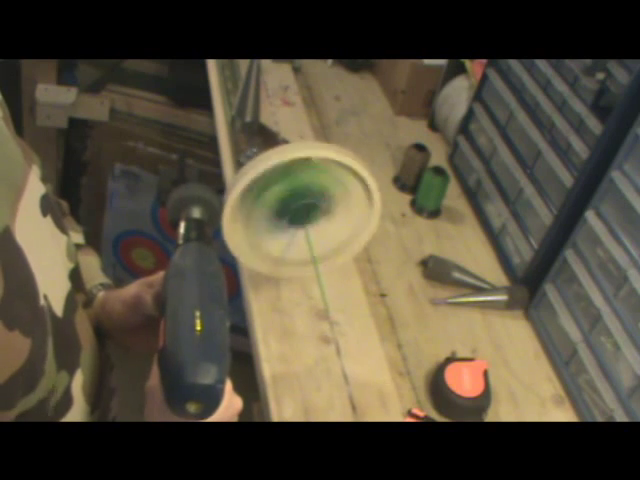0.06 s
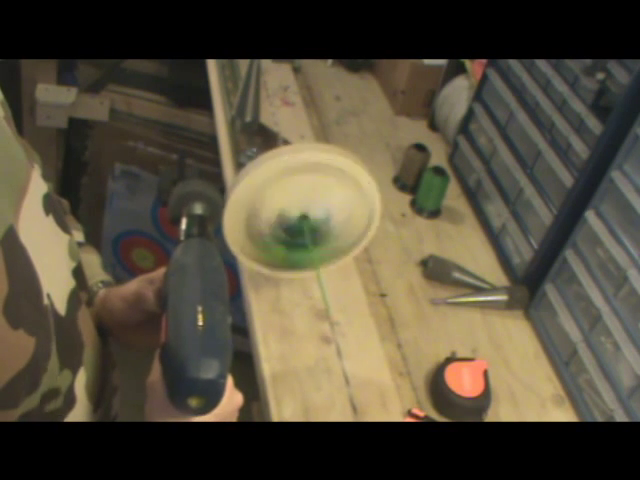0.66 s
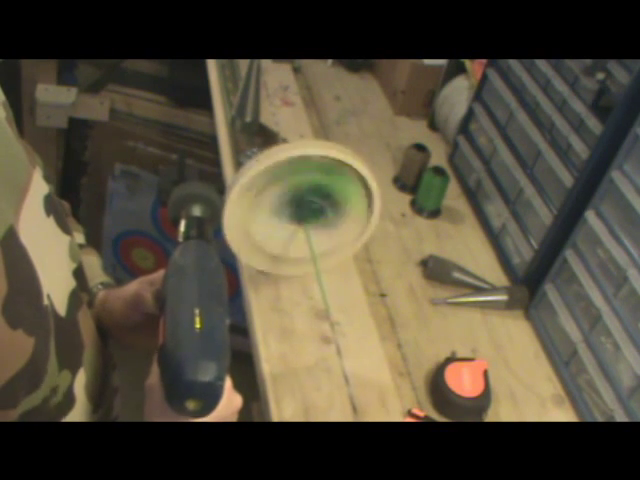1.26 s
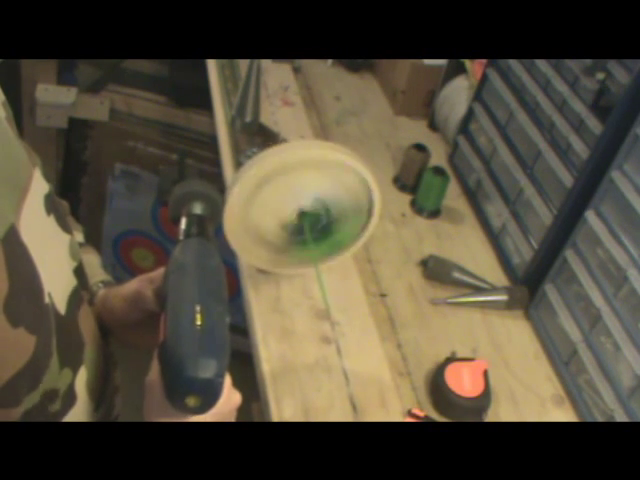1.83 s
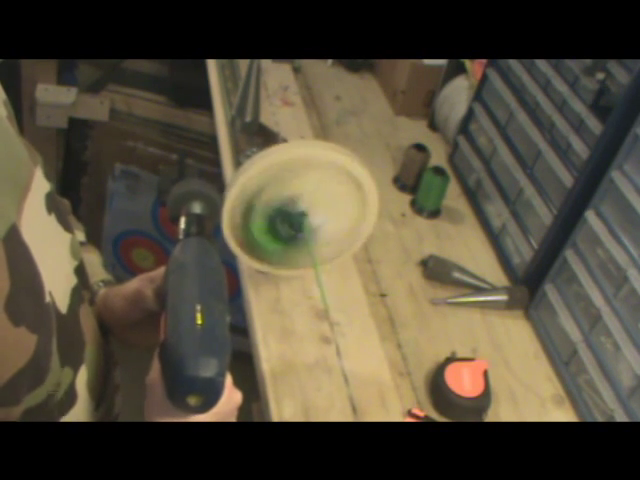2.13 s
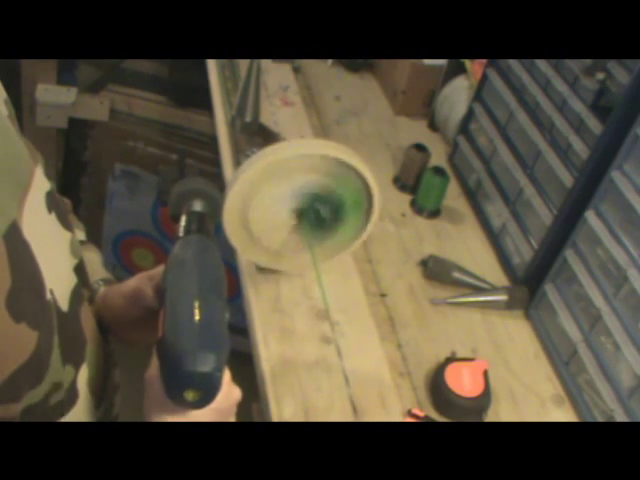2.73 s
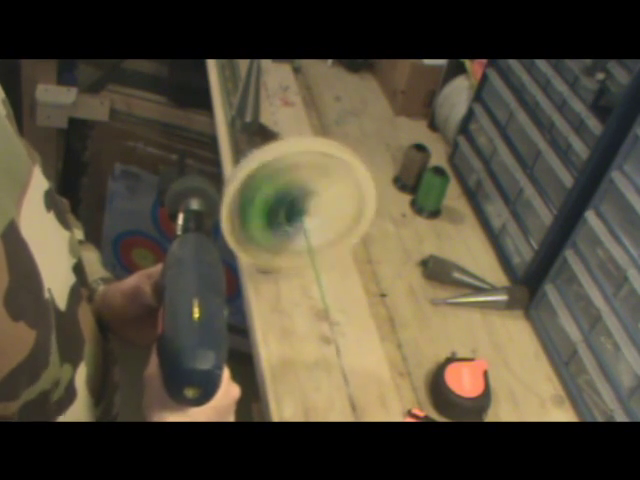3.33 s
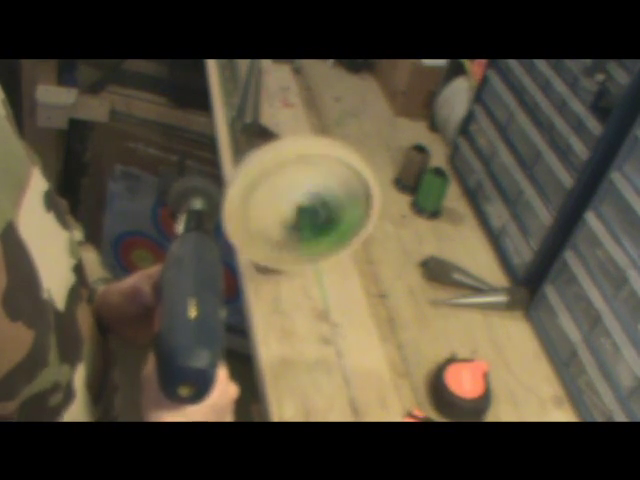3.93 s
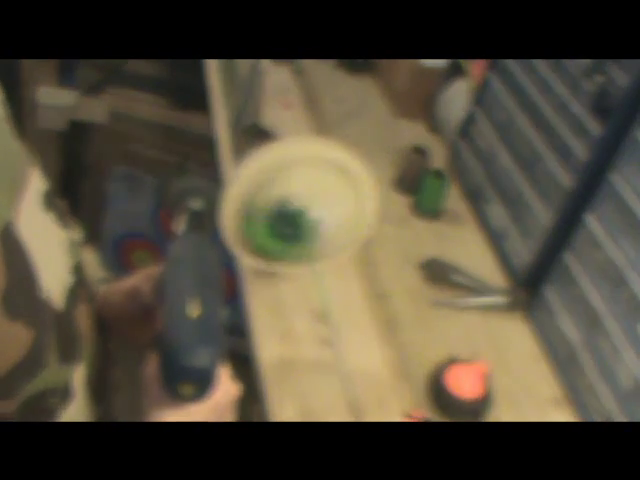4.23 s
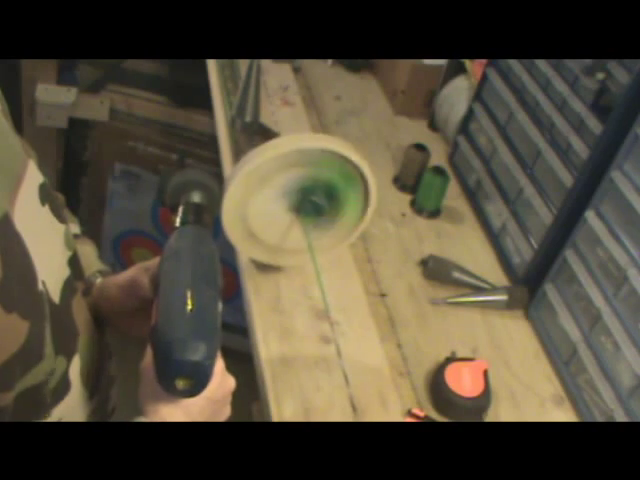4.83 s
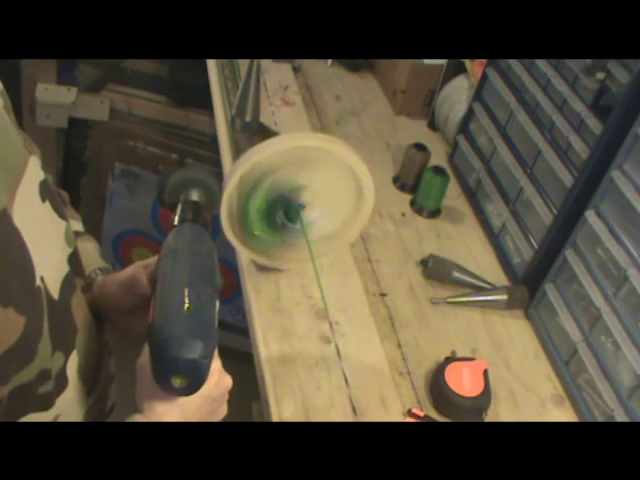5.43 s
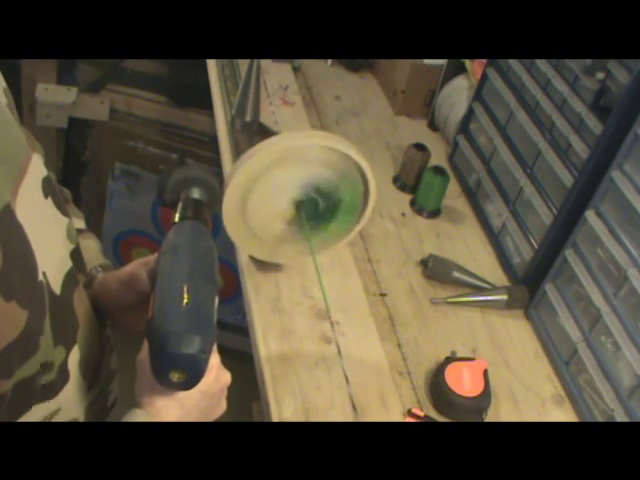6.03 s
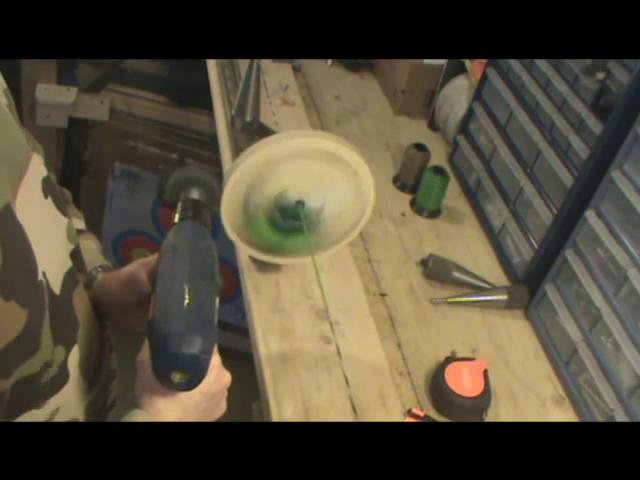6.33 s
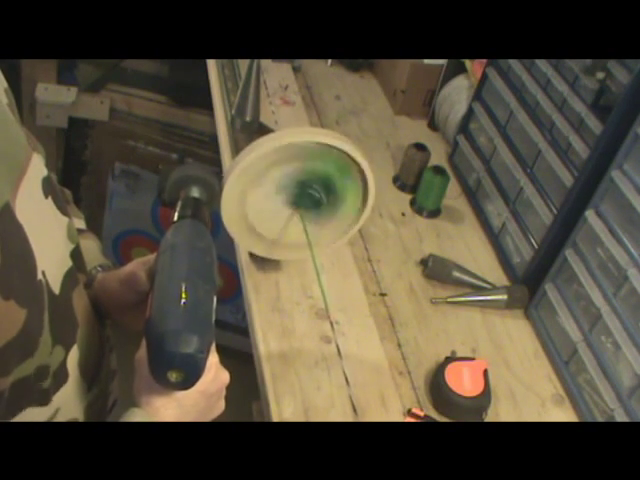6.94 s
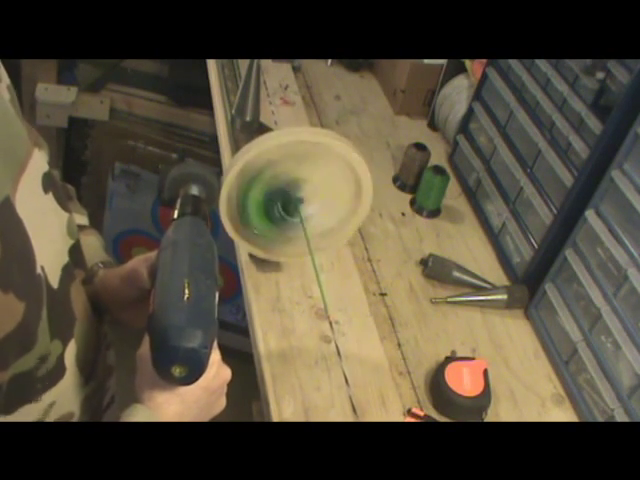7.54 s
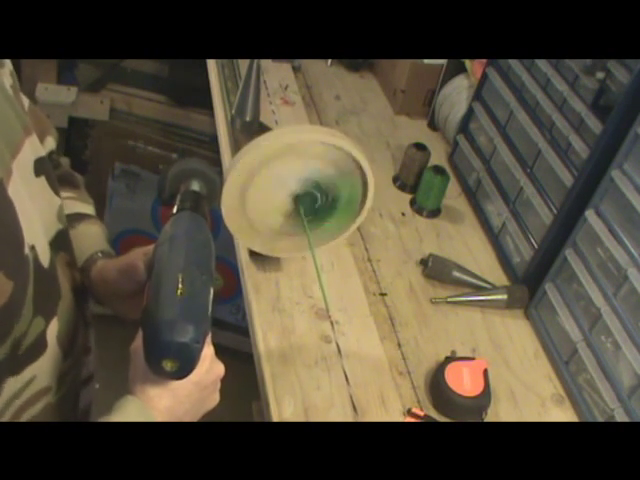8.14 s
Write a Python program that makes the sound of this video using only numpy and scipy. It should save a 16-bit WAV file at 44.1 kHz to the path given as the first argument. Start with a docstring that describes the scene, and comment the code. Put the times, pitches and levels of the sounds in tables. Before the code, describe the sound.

An electric drill is already running at the start and holds an almost constant speed for the whole eight seconds, close to a stereo microphone in a workshop. The main sound is a bright, airy rush from its fan with a hiss from the brushes, roughened by faint gear chatter. Within it sit a motor hum and a steady, high fan whine. A much higher, thin whistle, slightly to the left, slowly swells and sinks: strongest at the start, around 4 seconds and at the end, weakest near 2 and 6 seconds. The bench and walls add short, soft echoes, and a very faint low room rumble lies underneath. From about 7.7 seconds the hum falls away and the whine softens slightly, while the rush continues unchanged and the drill keeps running.

```python
"""An electric drill runs over a wooden bench, close to a stereo microphone, slowly turning a ball-winding tool.
From the start, its fan and brushes rush through the housing, the gears chatter faintly, the rotor hums,
and fan and commutator whine. Bench and walls echo the rush, and the workshop rumbles faintly.
As it runs on at an almost steady speed, the commutator's whistle slowly swells and sinks.
Near the end the grip shifts: the hum falls away and the fan tone softens a little."""
import sys
import numpy as np
from scipy.fft import rfft, irfft, next_fast_len
from scipy.io import wavfile
from scipy.ndimage import map_coordinates

SR = 44100
rng = np.random.default_rng(int(sys.argv[2]) if len(sys.argv) > 2 else 0)


def wav_record(signal):
    """Record a signal, one row per channel, as 16-bit PCM in the file named by sys.argv[1]."""
    frames = np.transpose(np.atleast_2d(signal))
    bounded = np.clip(frames, -1, 1)
    # unit amplitude maps onto the largest positive 16-bit level
    quanta = np.round(bounded * 32767).astype(np.int16)
    wavfile.write(sys.argv[1], SR, quanta)


N = 360738


def amp(db):
    """Turn decibels into a number to multiply by."""
    return 10 ** (np.asarray(db) / 20)


def unit(x):
    """Scale a sound to an average strength (rms) of 1."""
    return x / np.sqrt(np.mean(x ** 2) + 1e-20)


def along(points, hz):
    """Read between the rows of a (pitch_hz, value) table, on a log pitch scale."""
    pitches, values = np.transpose(points)
    return np.interp(np.log(hz + 1), np.log(pitches + 1), values)


def wobble(rate_hz):
    """A smooth curve through rate_hz random values a second."""
    values = rng.standard_normal(int(N * rate_hz / SR) + 4)
    return map_coordinates(values, [np.arange(N) * rate_hz / SR])


def filtered(x, response):
    """Multiply each frequency in a sound by response(hz)."""
    size = next_fast_len(N + 8192)
    return irfft(rfft(x, size) * response(np.fft.rfftfreq(size, 1 / SR)), size)[..., :N]


def panned(left_db):
    """Two gains that make the left side left_db louder than the right."""
    return amp(np.array([[.5], [-.5]]) * left_db)


def workshop_echoes(x, echo_db, ring_s, dull_hz, positions=5):
    """Bench and walls add short echoes, which drift as the hand moves the drill."""
    t = np.arange(SR // 4) / SR
    tails = rng.standard_normal((positions, 2, len(t))) * amp(-60 * t / ring_s) * (t > .003)
    tails /= np.linalg.norm(tails, axis=-1, keepdims=True)
    echoes = irfft(rfft(x) * rfft(tails, N), N)
    # each position of the drill has its own echoes and fades into the next
    position = np.linspace(0, positions - 1, N)
    nearness = np.clip(1 - abs(position - np.arange(positions)[:, None, None]), 0, 1)
    echo = np.sum(np.sqrt(nearness) * echoes, axis=0)
    return unit(x + amp(echo_db) * filtered(echo, lambda hz: 1 / (1 + 1j * hz / dull_hz)))


# The broad shape of the rush of fan and brushes: pitch_hz, relative_db
RUSH_SHAPE = [(30, -38), (180, -29.5), (400, -21.5), (700, -8.5), (1150, -5.5), (1450, -5), (2900, 0.0),
              (3800, -5), (6700, -8.5), (8000, -4.5), (9800, -11.5), (11300, -8.5), (14500, -20),
              (15600, -25.5)]
# Pitches that the housing and its surroundings boost or weaken: pitch_hz, width_hz, boost_db
HOUSING_PEAKS = [(103, 32, 6.1), (221, 19, 4.6), (275, 33, 2.8), (493, 77, 8.1), (580, 73, -7.1),
                 (783, 12, -4.2), (920, 44, -4.8), (1064, 77, 2.2), (1189, 136, -6.0), (1308, 99, 3.7),
                 (1467, 120, 4.4), (1592, 58, 4.1), (1755, 63, 3.6), (1916, 127, 4.8), (1980, 51, 4.5),
                 (2207, 37, -3.5), (2250, 55, 3.6), (2432, 36, 5.2), (2956, 38, -3.1), (3078, 76, 2.5),
                 (3343, 84, 5.1), (3506, 104, 3.1), (4182, 80, 3.6), (4387, 68, 3.3), (4588, 357, 3.2),
                 (5470, 39, 3.8), (5649, 332, 2.9), (7970, 65, 2.3), (12305, 981, -3.7), (13180, 434, 3.3)]

def housing(hz):
    """The gain of the rush at each pitch: a broad hump with the housing's peaks and hollows."""
    peaks_db = sum(db / (1 + (2 * (hz - centre) / width) ** 2) for centre, width, db in HOUSING_PEAKS)
    return amp(along(RUSH_SHAPE, hz) + peaks_db)


# How alike the rush is on the left and right: pitch_hz, likeness (0 to 1)
STEREO_LIKENESS = [(60, .88), (350, 0.81), (490, 0.89), (580, 0.49), (700, 0.72), (1500, 0.74),
                   (3000, 0.76), (5000, 0.7), (6600, 0.6), (8000, 0.79), (10000, 0.74), (15000, 0.95)]
# How much louder it is on the left: pitch_hz, left_db
LEFT_LOUDER = [(100, .5), (350, 2.5), (480, 1), (590, 0.5), (740, 3), (890, 0), (1250, 3), (1900, 1),
               (3000, 0), (6100, -1), (7100, 2.6), (11500, 2), (15000, .2)]
# How far its wave is ahead on the left: pitch_hz, lead_radians
LEFT_AHEAD = [(100, 0), (650, -0.67), (1100, -0.19), (1950, -0.72), (3600, -0.11), (5600, 0.2), (6400, 0.5),
              (7200, .1), (12500, -.1)]

def at_microphone(noises):
    """Two unrelated noises, coloured by the housing, become a partly alike left and right."""
    def blend(hz):
        angle = np.arccos(np.clip(along(STEREO_LIKENESS, hz), -1, 1)) / 2
        return housing(hz) * np.array([np.cos(angle), np.sin(angle)])

    def placement(hz):
        lead = np.exp(np.array([[.5j], [-.5j]]) * along(LEFT_AHEAD, hz))
        return panned(along(LEFT_LOUDER, hz)) * lead

    mid, side = filtered(noises, blend)
    return filtered(np.array([mid + side, mid - side]), placement)


def rush(split_hz, air_db, hiss_db, chatter_db):
    """Fan air rushes below split_hz and brushes hiss above it; slack in the gears shakes both."""
    noises = workshop_echoes(rng.standard_normal((2, N)), echo_db=-12.5, ring_s=0.13, dull_hz=11000)
    noise = at_microphone(noises)
    air = filtered(noise, lambda hz: 1 / (1 + (hz / split_hz) ** 6))
    shake_db = chatter_db * wobble(110)
    fan = unit(air) * amp(air_db + shake_db + 0.17 * wobble(22))
    # the brushes ride unevenly on the commutator, the rotor's ring of contacts
    brushes = unit(noise - air) * amp(hiss_db + shake_db + 0.47 * wobble(60) + 0.25 * wobble(10))
    return fan + brushes


def tone(turns, cycles_per_turn, flutter_db, slip_radians=0.2):
    """A tone that follows the rotor, fluttering in strength and timing."""
    phase = 2 * np.pi * (cycles_per_turn * turns + rng.random()) + slip_radians * wobble(25)
    return unit(np.sin(phase) * amp(flutter_db * wobble(9)))


# The tones of rotor and gears: cycles_per_turn, level_db, flutter_db, left_db
ROTOR_TONES = [(1, -49, 0, 6), (2, -54.5, 1.5, 0), (3, -54, 6, -1), (4, -42.5, 2, 1), (5.61, -57, 5, 0),
               (6.2, -53, 1, 0), (11.61, -50, 4, 0), (11.8, -56, -5, 0), (12, -55, 0, 0),
               (13, -47.5, 2, -1)]

def rotor_hum(turns):
    """The spinning rotor and its gears hum at multiples of the rotor's speed."""
    return sum(panned(left_db) * amp(level_db) * tone(turns, cycles_per_turn, flutter_db)
               for cycles_per_turn, level_db, flutter_db, left_db in ROTOR_TONES)


def fan_tone(turns, level_db):
    """The passing blades of the cooling fan make one steady note."""
    return amp(level_db) * tone(turns, cycles_per_turn=6, flutter_db=0.2, slip_radians=.3)


# The commutator's main tone and its weaker neighbours: cycles_per_turn, relative_db
WHISTLE_TONES = [(23, -10), (23.75, -8.5), (24, 0), (24.25, -8.5), (25, -8)]

def commutator_whistle(turns, t, level_db, swell_db, peak_s, period_s):
    """Contacts passing under the brushes make a thin whistle that swells, sinks and wanders in level."""
    swell = np.cos(2 * np.pi * (t - peak_s) / period_s)
    gain = amp(level_db + swell_db * swell + .9 * wobble(3))
    whistle = sum(amp(db) * tone(turns, cycles, flutter_db=2) for cycles, db in WHISTLE_TONES)
    return panned(left_db=5.0) * gain * whistle


# The shape of the workshop's low rumble: pitch_hz, relative_db
RUMBLE_SHAPE = [(25, -18), (47, 3), (66, -14), (108, -3), (145, -27), (400, -60), (2000, -120)]

def room_rumble(level_db):
    """The room rumbles faintly, the same in both ears, and wanders slowly in strength."""
    rumble = filtered(rng.standard_normal(N), lambda hz: amp(along(RUMBLE_SHAPE, hz)))
    return unit(rumble) * amp(level_db + 1.8 * wobble(1.96))


def grip_shift(t, drop_db, start_s=7.7, length_s=0.41):
    """A gain that turns a tone down as the hand shifts its grip."""
    return amp(-drop_db * np.clip((t - start_s) / length_s, 0, 1))


def scene():
    """The turning rotor drives every tone of the drill, over the rush and the room's rumble."""
    t = np.arange(N) / SR
    start_hz, creep_hz_per_s = 470.3, .38  # the rotor gains speed very slowly
    speed_hz = start_hz + creep_hz_per_s * t + 0.15 * wobble(14)
    turns = np.cumsum(speed_hz) / SR
    air_and_hiss = rush(split_hz=4460, air_db=-24, hiss_db=-26.5, chatter_db=0.41)
    hum = rotor_hum(turns) * grip_shift(t, drop_db=7)
    fan = fan_tone(turns, level_db=-39) * grip_shift(t, drop_db=2)
    whistle = commutator_whistle(turns, t, level_db=-44.8, swell_db=2, peak_s=4, period_s=4.1)
    return air_and_hiss + hum + fan + whistle + room_rumble(level_db=-68.5)


def record(dry):
    """Cut away the very highest treble."""
    return filtered(dry, lambda hz: hz < 15700)


dry = scene()
out = record(dry)
wav_record(out)
```